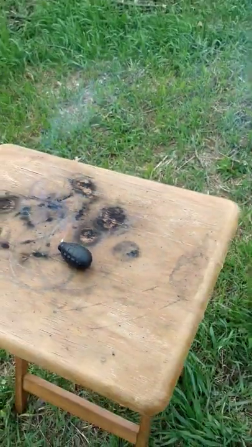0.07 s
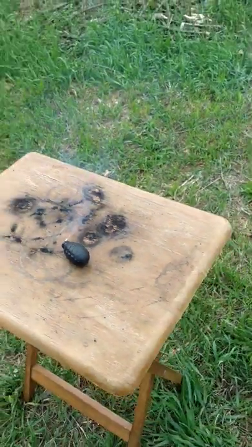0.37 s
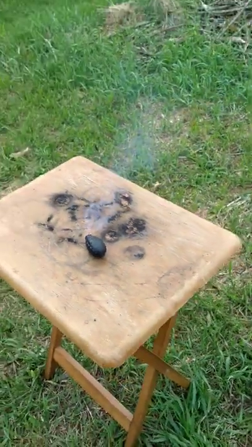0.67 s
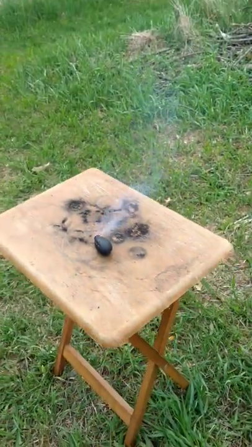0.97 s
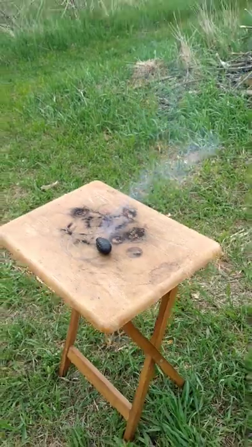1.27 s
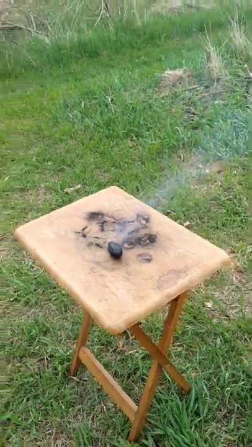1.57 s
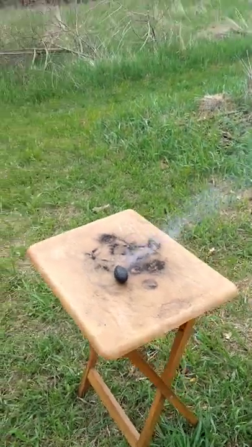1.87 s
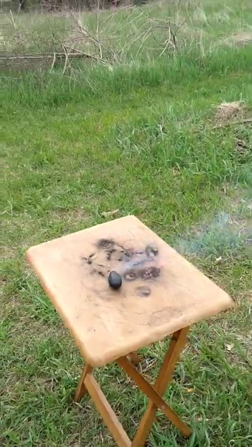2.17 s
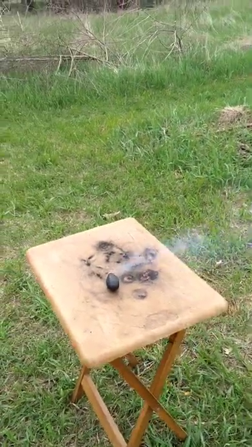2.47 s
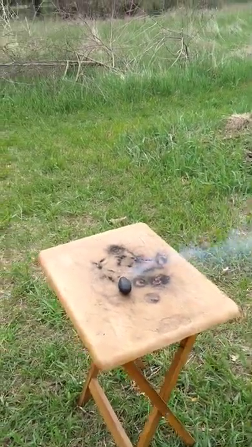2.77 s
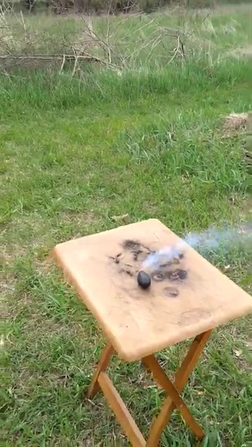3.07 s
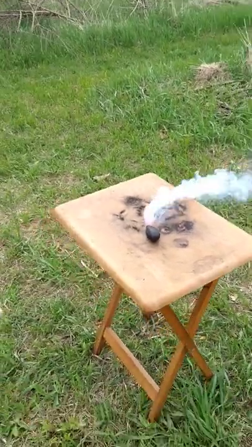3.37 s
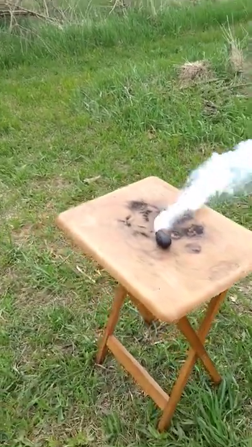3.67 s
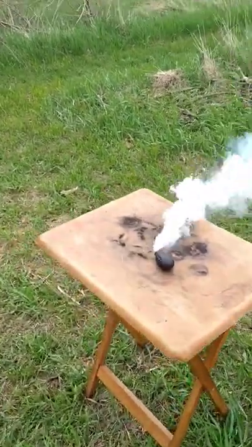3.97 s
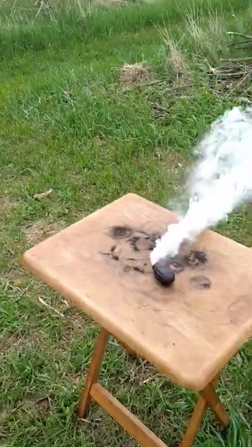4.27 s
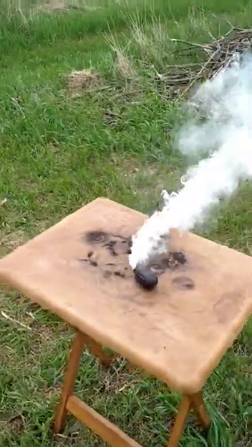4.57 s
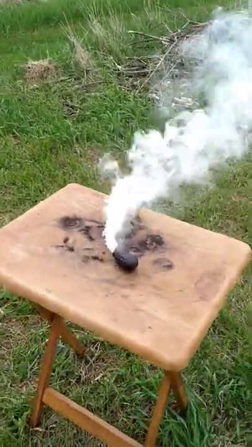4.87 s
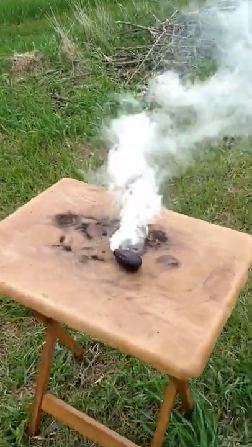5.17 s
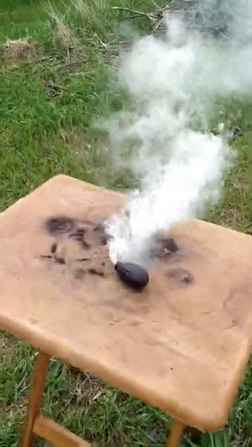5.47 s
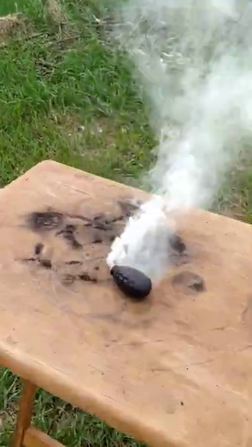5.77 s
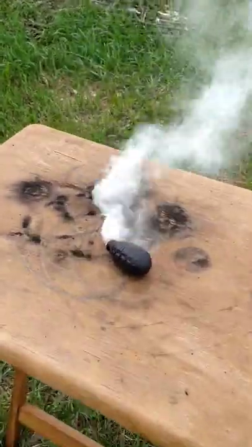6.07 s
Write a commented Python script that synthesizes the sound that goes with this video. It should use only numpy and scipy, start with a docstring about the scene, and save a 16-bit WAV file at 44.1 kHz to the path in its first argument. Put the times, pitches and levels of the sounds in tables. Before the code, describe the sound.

Outdoors in a quiet field, uneven wind buffets the microphone with low thumps, strongest near the start. Under it a nearby fuse fizzes, gives two quick ticks, and takes on a hollow, slightly whistling tone. A dry, sharp pop and a short flare of hiss mark the smoke bomb catching. A softer jet follows, fluttering and spitting as smoke pours out, with no echo.

```python
"""A small smoke bomb burns on a wooden table outdoors, with wind buffeting the microphone.
First the fuse hisses and spits twice; the hiss turns hollow as the flame sinks into the shell's neck.
Near 2.85 s the charge catches with a sharp pop that rings the shell, and a short, bright flare.
From 3.1 s smoke pours through the nozzle in a softer, sputtering jet; late on the nozzle burns open."""
import sys
import numpy as np
from scipy import signal
from scipy.fft import rfft, irfft
from scipy.io import wavfile
from scipy.ndimage import uniform_filter1d

SR = 44100
rng = np.random.default_rng(int(sys.argv[2]) if len(sys.argv) > 2 else 0)


def store_pcm(level_fs):
    """Save levels as 16-bit WAV."""
    pcm = np.round(np.clip(level_fs, -1, 1) * 32767).astype(np.int16)
    wavfile.write(sys.argv[1], SR, np.atleast_2d(pcm).T)


N = 269451
TIME = np.arange(N) / SR
FRAME, HOP = 512, 128  # samples; the jets are shaped frame by frame
FRAME_S = np.arange(N // HOP + 5) * HOP / SR
BIN_HZ = np.fft.rfftfreq(FRAME, 1 / SR)

# where the shell sits as the microphone moves, positive to the left: time_s, pan_db
SHELL_PAN = [(.3, -2.5), (.75, 2), (1.2, 1), (1.4, 5), (1.65, 4.5), (2.0, 7.5), (2.93, 6.5), (3.15, -.5),
             (3.58, 2), (3.75, 6.5), (4.35, 8), (6.11, 3)]


def fuse():
    """The fuse's hiss turns hollow as the flame sinks into the resonant neck; then the charge flares."""
    # how hard the fuse burns, and the vent's whistle on top: time_s, level_db, whistle_db
    burn = [(0, -49, 5.5), (.37, -48.5, 13), (.48, -52.5, 5.5), (.68, -57.5, 3), (.81, -62, 2),
            (.99, -54.5, -1.5), (1.2, -55.5, 2.5), (1.39, -54.5, 10.5), (1.58, -58, 9), (1.74, -50.5, -2.5),
            (1.81, -61.5, 4), (2.04, -56.5, 6.5), (2.28, -58.5, -1), (2.42, -54, 0.5), (2.58, -56, 6),
            (2.84, -47.5, 3.5), (3.03, -53.5, 3), (3.11, -54.5, -1.5)]
    # the flame's way into the shell: time_s, depth (0-1), neck_hz, vent_hz
    descent = [(0, 0, 3300, 5180), (.7, 0, 3400, 5300), (1.18, 0.39, 4250, 4740), (1.35, 0.54, 3960, 5120),
               (1.48, 0.73, 4020, 5910), (1.72, 0.79, 3770, 6680), (2.02, 0.83, 3800, 7280),
               (2.35, 0.99, 3900, 6860), (2.8, 1, 3270, 6730), (2.92, 0.69, 3700, 6180),
               (3.06, 0.32, 3650, 6800)]
    # ride of the fizzing treble: time_s, level_db
    fizz_ride = [(0, -56), (.37, -50.5), (.56, -60), (.81, -70), (1.0, -70), (1.31, -73.5), (1.4, -63),
                 (1.55, -63), (1.8, -72), (2.12, -63), (2.28, -68.5), (2.6, -59.5), (2.84, -57),
                 (3.11, -62.5)]
    # tone of the rush and the fizz, in the open and down the neck: freq_hz, gain_db
    open_rush = [(100, -25), (400, -0.5), (700, -2), (1000, 2.5), (1400, 3), (2500, 2.5), (3200, 0.5),
                 (4200, -5), (6000, -5.5), (8000, -12), (12000, -41)]
    neck_rush = [(100, -12), (400, -11.5), (700, -15), (1100, -14.5), (1800, -8), (2200, -2.5), (2450, 6.5),
                 (2740, -8), (3300, -7.5), (4100, -11.5), (4850, -16.5), (5900, -5), (9000, -27)]
    open_fizz = [(4000, -35), (7000, -3.5), (8500, -2.5), (10200, -5), (11700, -3.5), (13500, -5.5),
                 (15500, -12)]
    neck_fizz = [(5000, -25), (7900, -0.5), (8750, 4.5), (9600, -5.5), (10400, -5.5), (11400, -1),
                 (12300, -11), (13500, 4), (14800, 12), (15500, 7)]
    # how alike left and right sound: freq_hz, correlation
    likeness = [(100, 0.48), (640, 0.69), (1400, 0.25), (3100, 0.47), (4800, 0.87), (6800, 0.31),
                (10000, 0.067), (15000, .3)]
    t = FRAME_S[:, None]
    burn_db, whistle_db = follow(burn, t)
    depth, neck_hz, vent_hz = follow(descent, t)
    pan_db, = follow(SHELL_PAN, t)
    flare = bump(t, centre=2.93, width=0.05)
    rush_db = burn_db + 3.5 + 4.5 * flare - 0.5 * depth
    neck_db = burn_db - 16 + 23.5 * bump(depth, centre=0.68, width=0.36)  # rings most part way down
    vent_db = burn_db + whistle_db - 0.8 + 10.5 * flare
    fizz_db = follow(fizz_ride, t)[0] + 12.5 * flare
    rush = gain_of((1 - depth) * curve_at(open_rush, BIN_HZ) + depth * curve_at(neck_rush, BIN_HZ))
    fizz = tone(open_fizz) ** (2 - depth ** 2) * tone(neck_fizz) ** (depth ** 2)
    layers = [(rush, rush_db, (0.34 + 0.54 * depth) * pan_db),
              (resonance(neck_hz, width_hz=1800 - 550 * depth), neck_db, 0.76 * pan_db + 0.88),
              (resonance(vent_hz, width_hz=2370 - 1180 * depth), vent_db, 1.5 * pan_db + 7.5),
              (fizz, fizz_db, 1.25 * pan_db + 3 + 9 * flare)]
    # the right side hears the hiss slightly later as the flame sinks into the neck
    right_lag_s = 45e-6 + 22e-6 * depth ** 2
    hiss = jet(layers, likeness, right_lag_s, echo_gain=0.22, patchy_db=1.4)
    return hiss * flutter(slow_hz=13, fast_hz=154, depth_db=1.2)


def smoke():
    """Smoke rushes through the nozzle, spurts now and then, and sputters more as the charge burns on."""
    # how hard the smoke flows, and the nozzle's ring on top: time_s, level_db, ring_db
    flow = [(3.13, -58.5, 1), (3.19, -53, -4), (3.38, -51, 2.5), (3.54, -50, 7.5), (3.64, -67.5, 6),
            (3.7, -56, 1.5), (3.92, -57.5, 4.5), (4.07, -66, 4.5), (4.29, -60.5, 2.5), (4.6, -62.5, 0),
            (5.2, -62.5, -1), (5.31, -69.5, 4), (5.75, -68.5, 7.5), (5.92, -70.5, 5.5), (6.11, -62.5, 6.5)]
    # the nozzle's resonance sinks as it burns open: time_s, pitch_hz, width_hz
    nozzle = [(3.1, 3270, 1300), (3.5, 3280, 1000), (3.75, 3150, 760), (5.15, 2960, 850),
              (5.35, 2860, 1430), (6.11, 2867, 1380)]
    # spurts of smoke: centre_s, half_length_s, lift_db, fizz_lift_db
    spurts = [(3.789, 0.023, 11.5, 12), (4.396, 0.049, -4.5, 11.5), (4.49, 0.041, 5.5, 6),
              (4.855, 0.02, 5.5, 1), (5.245, 0.02, 12, -7), (5.338, 0.021, 7, 4), (5.536, 0.011, 8.5, 9),
              (5.843, .015, 5.5, 0)]
    # tone of the jet's body, hiss and top: freq_hz, gain_db
    rush = [(200, -4), (600, -8), (1100, -11), (1600, -5), (2100, -2), (2480, 6.5), (2750, 2), (3300, -16),
            (4000, -4.5), (4800, -19), (7000, -42.5)]
    hiss = [(2500, -36), (4000, 5), (4800, 2.5), (5600, 3), (6800, -2.5), (7800, -6), (9500, -19),
            (12000, -40)]
    fizz = [(5000, -20), (7400, 9.5), (8600, 9), (9800, 3.5), (11300, -3), (13000, -3), (15000, 5),
            (15600, -33)]
    # how alike left and right sound: freq_hz, correlation
    likeness = [(100, 0.11), (640, 0.5), (1400, 0.86), (3100, 0.81), (6800, 0.42), (15000, 0.16)]
    t = FRAME_S[:, None]
    flow_db, ring_db = follow(flow, t)
    pan_db, = follow(SHELL_PAN, t)
    spurt_db = sum(db * bump(t, s, width) for s, width, db, _ in spurts)
    spray_db = sum(db * bump(t, s, width) for s, width, _, db in spurts)
    widened = np.interp(t, [5.23, 5.27], [0, 1])  # the nozzle burns open: more hiss, less fizz
    hiss_db = -25 + 0.69 * flow_db + 0.83 * spurt_db + 5.5 * widened
    fizz_db = -35.5 + 0.6 * flow_db + spray_db - 7.5 * widened
    vent_db = flow_db + np.interp(t, [3.6, 3.64], [-11, -31])  # the vent sings on until it clears
    layers = [(tone(rush), flow_db + 1.55 + 0.54 * spurt_db, pan_db - 0.8),
              (resonance(*follow(nozzle, t)), flow_db + ring_db + spurt_db - 0.7, pan_db + 2),
              (resonance(centre_hz=6800, width_hz=2200), vent_db, pan_db + 5),
              (tone(hiss), hiss_db, 0.85 * pan_db + 4 * widened),
              (tone(fizz), fizz_db, pan_db + 13)]
    sputter = flutter(slow_hz=28, fast_hz=220, depth_db=2) ** np.interp(TIME, [3.4, 4.1], [0.55, 1])
    return jet(layers, likeness, right_lag_s=-7.3e-6, echo_gain=0.12, patchy_db=2) * sputter


def jet(layers, likeness, right_lag_s, echo_gain, patchy_db):
    """Turbulent gas noise at the microphone's two ports; each layer is (colour, level_db, pan_db)."""
    # a near reflection shifts as the microphone moves: time_s, lag_s
    reflection = [(0, 0.0017), (.7, 0.0017), (1.45, 0.002), (2.8, 0.0014), (3.7, 0.00186), (5.2, 0.0018),
                  (6.11, 0.0016)]
    a, b, c, d, patches = rng.standard_normal((len(FRAME_S), len(BIN_HZ), 5)).transpose(2, 0, 1)
    alike = np.clip(curve_at(likeness, BIN_HZ), -0.9, 0.9)
    delay = np.exp(-2j * np.pi * BIN_HZ * right_lag_s)
    left = a + 1j * b
    right = alike * delay * left + np.sqrt(1 - alike ** 2) * (c + 1j * d)
    power = 0
    for colour, level_db, pan_db in layers:
        ports = gain_of([pan_db / 2, -pan_db / 2])
        colour = unit_rms(colour, axis=-1)
        # the level is set on the mono mix
        mono_spectrum = colour ** 2 * ((ports ** 2).sum(0) + 2 * alike * delay.real) / 4
        mono_power = np.mean(mono_spectrum, axis=-1, keepdims=True)
        power = power + (colour * gain_of(level_db) * ports) ** 2 / mono_power
    echo_s, = follow(reflection, FRAME_S[:, None])
    comb = unit_rms(abs(1 + echo_gain * np.exp(2j * np.pi * BIN_HZ * echo_s)))
    # random patches in time and frequency make the colour flicker
    patches = unit_rms(uniform_filter1d(uniform_filter1d(patches, size=14, axis=0), size=9, axis=1))
    frames = np.array([left, right]) * np.sqrt(power) * comb * unit_rms(gain_of(patchy_db * patches))
    _, hiss = signal.istft(frames.swapaxes(1, 2), nperseg=FRAME, noverlap=FRAME - HOP)
    return hiss[:, :N] * np.sqrt(3 / FRAME)


def pops():
    """Each pocket of powder throws a short pressure wave and rings the shell; the table bounces it back."""
    # powder pops: start_s, level_db, pitch_hz, swell_s, rise_octaves_per_s, ring_db, pan_db
    pockets = [(0.7295, -21.5, 1400, 0.00083, 530, -25, 11), (0.7447, -21.5, 1430, 0.00066, 550, -21.5, 8),
               (2.335, -28.5, 332, 0.00042, 150, -43, 24), (2.8492, -8, 493, 0.00033, 100, -9.5, 30)]
    # modes of the shell: pitch_hz, level_db, t60_s, delay_s
    shell_modes = [(2330, -5.5, 0.0096, 0.0007), (3380, -5.5, 0.007, 0.00079),
                   (5830, -6.5, 0.006, 0.000416), (10500, -10.5, 0.0016, 0.000013),
                   (14800, -30, 0.0027, 0.000026)]
    out, t = np.zeros((2, N)), np.arange(SR // 50) / SR
    ring = snap = 0
    for hz, db, t60_s, delay_s in shell_modes:
        age = np.maximum(t - delay_s, 0)
        mode = gain_of(db - 60 * age / t60_s) * np.sin(2 * np.pi * hz * age)
        if hz < 8000:
            ring = ring + mode
        else:
            snap = snap + mode
    for start_s, db, hz, swell_s, rise, ring_db, pan_db in pockets:
        turns = np.cumsum(hz * 2 ** np.minimum(rise * t, 1)) / SR  # chirps up one octave
        blast = -gain_of(db) * t / swell_s * np.exp(1 - t / swell_s) * np.sin(2 * np.pi * turns)
        shell = ring + gain_of(0.84 * (db + 12)) * snap  # the high snap grows with the pop's level, faster than the shell's ring
        pop = gain_of([[0], [-pan_db]]) * (blast + gain_of(ring_db) * shell)
        add(out, start_s, pop)
        add(out, start_s + 0.00238, gain_of(-21.5) * pop)  # off the table top
    return low_cut(out, hz=190)  # the pops carry no deep bass


def reflections(x, level_db, t60_s):
    """Adds weak, quick reflections from the table and the ground; open air leaves no tail."""
    t = np.arange(SR // 25) / SR
    taps = rng.standard_normal((2, len(t))) * (rng.random((2, len(t))) < 0.03)
    taps = taps * (t > 0.002) * gain_of(-60 * t / t60_s)
    taps = taps / np.linalg.norm(taps, axis=1, keepdims=True)
    return x + gain_of(level_db) * signal.oaconvolve(x, taps, axes=1)[:, :N]


def wind():
    """Gusts hit each port; a large eddy sweeps the small ones aside with one push."""
    # large single eddies: centre_s, level_db, pitch_hz, port (0 left, 1 right)
    thumps = [(.091, -17.5, 154, 1), (.552, -17, 160, 0), (.616, -16, 121, 0), (0.787, -8.5, 130, 0),
              (0.843, -8.5, 135, 1), (0.933, -11.5, 155, 1), (1.188, -13.5, 124, 0), (2.017, -25, 138, 1),
              (3.105, -18, 133, 1), (3.228, -23.5, 152, 0), (3.755, -17, 140, 1), (4.947, -13, 136, 1)]
    out = np.array([buffet(gust_level(port=0, breeze_db=-59.5)),
                    buffet(gust_level(port=1, breeze_db=-53))])
    for centre_s, db, hz, port in thumps:
        turns = (TIME - centre_s) * hz
        push = gain_of(db) * bump(turns, 0, 0.56) * np.cos(2 * np.pi * turns)
        duck = 1 - 0.42 * bump(turns, 0, 1.15)
        out[round(port)] = push + duck * out[round(port)]
    return out


def gust_level(port, breeze_db):
    """Wind level in dB at one port: each gust rises, holds and dies away over the breeze."""
    # gusts on the microphone: start_s, length_s, left_db, right_db
    gusts = [(0.01, 0.023, -28.5, -50), (0.062, 0.046, -41.5, -29), (0.188, 0.058, -28.5, -44),
             (0.318, 0.11, -35, -35.5), (0.467, 0.14, -29, -54), (0.61, 0.044, -25.5, -48),
             (0.778, 0.017, -20.5, -57), (0.848, 0.12, -35.5, -21), (0.964, 0.077, -61, -30.5),
             (1.082, 0.13, -26, -30.5), (1.236, 0.18, -40, -37.5), (1.644, 0.11, -48, -66),
             (2.002, 0.026, -69, -31.5), (2.057, 0.034, -60, -39), (2.35, 0.095, -71, -39),
             (2.594, 0.041, -70, -41.5), (2.887, 0.14, -41.5, -35), (3.059, 0.08, -32.5, -29),
             (3.172, 0.049, -32.5, -51), (3.304, 0.14, -58, -36.5), (3.646, 0.08, -37.5, -43),
             (3.742, 0.024, -31, -27), (3.863, 0.03, -34, -35.5), (4.156, 0.014, -34.5, -67),
             (4.222, 0.12, -50, -39.5), (4.431, 0.056, -55, -32), (4.576, 0.038, -33, -36.5),
             (4.663, 0.13, -36.5, -33.5), (4.878, 0.11, -30, -27.5), (5.041, 0.15, -34, -34.5),
             (5.341, 0.026, -36, -51), (5.506, 0.011, -47.5, -38.5), (5.726, 0.036, -47.5, -39.5),
             (5.943, 0.029, -69, -45.5), (6.089, 0.05, -55, -37.5)]
    # the breeze drops twice: centre_s, half_length_s, dip_db
    lulls = [(1.865, .13, -10.5), (5.83, 0.043, -15)]
    rise_s, fall_s = 0.013, 0.024
    power = gain_of(breeze_db + sum(db * bump(FRAME_S, s, width) for s, width, db in lulls)) ** 2
    for start_s, length_s, *port_db in gusts:
        early = np.maximum(start_s - FRAME_S, 0)
        late = np.maximum(FRAME_S - start_s - length_s, 0)
        power = power + (gain_of(port_db[port]) * np.exp(-early / rise_s - late / fall_s)) ** 2
    return np.interp(TIME, FRAME_S, 10 * np.log10(power))


def buffet(gust_db):
    """Eddies rumble on one port; stronger and more ragged gusts shed faster eddies, in bursts."""
    # tone of the large eddies, and of the small, quick ones torn off them: freq_hz, gain_db
    rumble = [(15, -42), (28, -24), (43, -14), (65, -3.5), (88, 4.5), (130, 0.5), (170, -7), (220, -16.5),
              (300, -35.5), (400, -30), (600, -50.5), (1500, -83)]
    tatter_tone = [(90, -31), (160, 2), (220, 8), (300, 1.5), (400, -20), (600, -22), (1500, -84)]
    # how ragged the wind is, as a ride on the small eddies: time_s, level_db
    raggedness = [(0, -16), (.85, -14), (1.2, -9.5), (2.0, -10), (2.5, -33), (3.15, -4), (3.8, -7),
                  (4.45, -35), (4.65, -2.5), (4.9, -20.5), (6.11, -8)]
    strength = np.clip((gust_db + 54.5) / 30, 0, 1)
    eddies = np.sqrt(1 - strength) * noise(rumble, stretch=0.92) + np.sqrt(strength) * noise(rumble)
    # a gust keeps its strength from one eddy to the next
    swell = uniform_filter1d(uniform_filter1d(eddies ** 2, size=1100), size=1100)
    eddies = eddies / np.sqrt(abs(swell) + 0.013)
    ragged_db, = follow(raggedness, TIME)
    tatters = gain_of(ragged_db) * strength ** 2 * noise(tatter_tone)
    tatters *= flutter(slow_hz=13, fast_hz=45, depth_db=4.5)
    eddies *= flutter(slow_hz=5.1, fast_hz=21.1, depth_db=4)
    return gain_of(gust_db + 0.74) * (eddies + tatters)


def field():
    """The faint, steady rustle of the field, wide in stereo."""
    # tone of the outdoor bed: freq_hz, gain_db
    rustle = [(20, -2), (90, 1.5), (200, 12), (400, -12.5), (1000, -4.5), (3000, -3), (8000, -36.5),
              (16000, -16)]
    return gain_of(-66) * np.array([noise(rustle), noise(rustle)])


def noise(spectrum, stretch=1):
    """Steady noise of the given colour, stretched along the frequency axis."""
    hz = np.fft.rfftfreq(N, 1 / SR)
    colour = gain_of(curve_at(spectrum, hz / stretch))
    return unit_rms(irfft(rfft(rng.standard_normal(N)) * colour, N))


def flutter(slow_hz, fast_hz, depth_db):
    """Uneven burning or blowing: a random gain that wanders between two rates."""
    hz = np.fft.rfftfreq(N, 1 / SR)
    band = hz / (hz + slow_hz) ** 1.5 / (1 + (hz / fast_hz) ** 2)
    wander = unit_rms(irfft(rfft(rng.standard_normal(N)) * band, N))
    return unit_rms(gain_of(depth_db * wander))


def resonance(centre_hz, width_hz):
    """A steep-sided peak in each frame."""
    return (1 + (BIN_HZ - centre_hz) ** 2 / width_hz ** 2) ** -4.0


def tone(spectrum):
    """An EQ curve in dB as one gain for each bin of a frame."""
    return gain_of(curve_at(spectrum, BIN_HZ))


def curve_at(points, hz):
    """A curve's value at the given frequencies, joined on a log axis."""
    freq_hz, value = np.transpose(points)
    return np.interp(np.log(hz + 1), np.log(freq_hz + 1), value)


def follow(rows, t):
    """Each column of an automation curve at the times t."""
    time_s, *columns = np.transpose(rows)
    return [np.interp(t, time_s, column) for column in columns]


def bump(t, centre, width):
    """A smooth rise and fall of height one."""
    return np.exp(-((t - centre) / width) ** 2)


def gain_of(db):
    """Decibels to amplitude."""
    return 10 ** (np.asarray(db) / 20)


def unit_rms(x, axis=None):
    """Scales to an rms of one."""
    return x / np.sqrt(np.mean(abs(x) ** 2, axis=axis, keepdims=True) + 1e-20)


def low_cut(x, hz):
    """Rolls off the bass at 12 dB per octave."""
    return signal.sosfilt(signal.butter(2, hz, "high", fs=SR, output="sos"), x)


def add(mix, start_s, sound):
    """Lays a stereo sound into the mix."""
    part = mix[:, round(start_s * SR):][:, :sound.shape[1]]
    part += sound[:, :part.shape[1]]


def scene():
    """The fuse hands over to the smoke jet, under wind and the faint rustle of the field."""
    handover = np.interp(TIME, [3.1, 3.14], [0, 1])
    hiss = np.sqrt(1 - handover) * fuse() + np.sqrt(handover) * smoke()
    bed = field()
    hiss = reflections(hiss, level_db=-10.5, t60_s=0.038)
    cracks = reflections(pops(), level_db=-9, t60_s=0.032)
    return hiss + cracks + wind() + bed


def record(dry):
    """The microphone's low cut and the recorder's band limit."""
    band_limit = signal.firwin(511, cutoff=15680, window=("kaiser", 9), fs=SR)
    return signal.oaconvolve(low_cut(dry, hz=37.4), band_limit[None], "same")


dry = scene()
out = record(dry)
store_pcm(out)
```